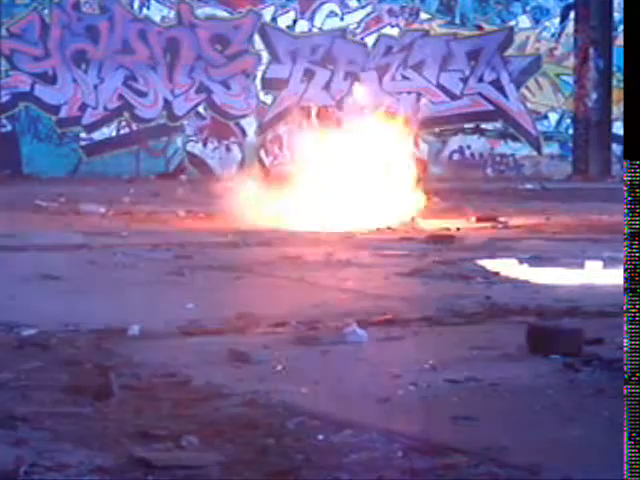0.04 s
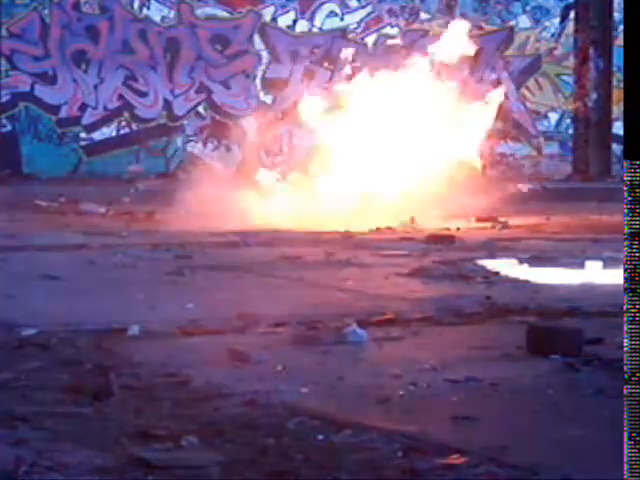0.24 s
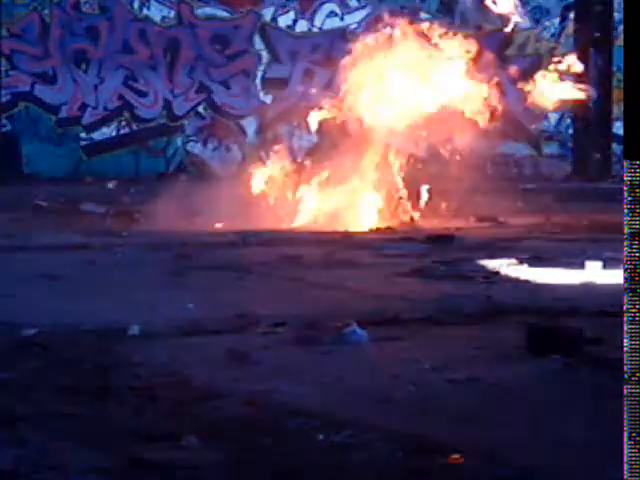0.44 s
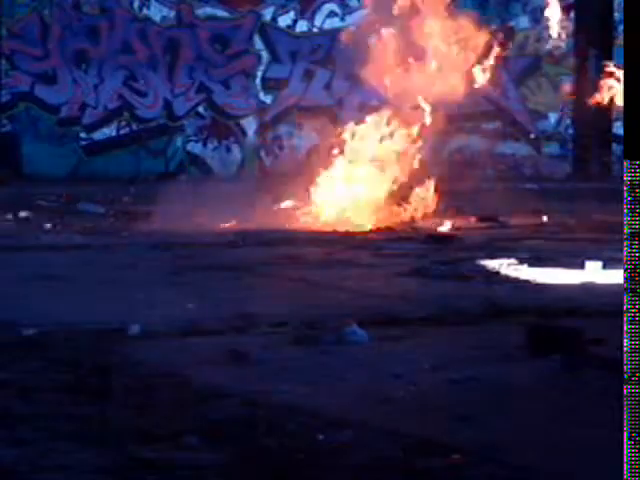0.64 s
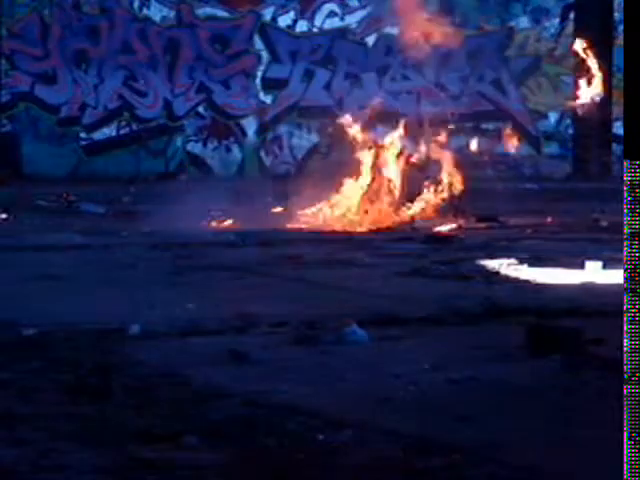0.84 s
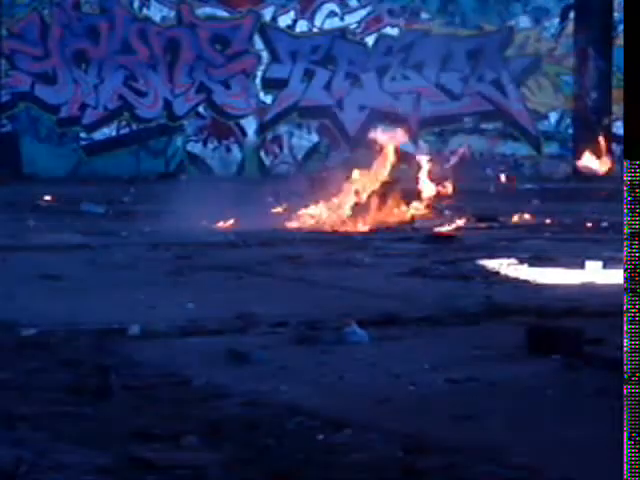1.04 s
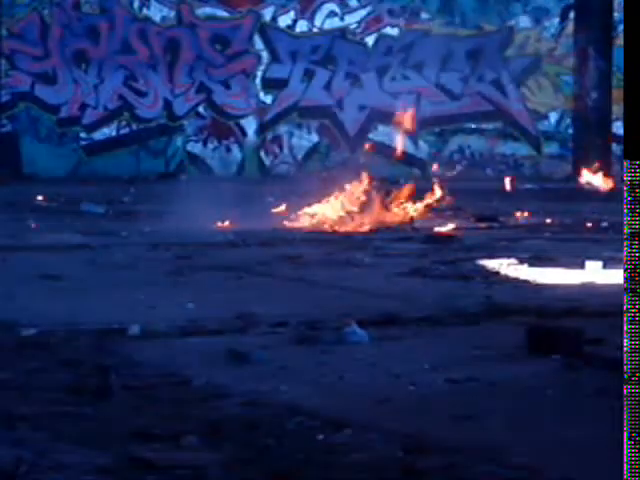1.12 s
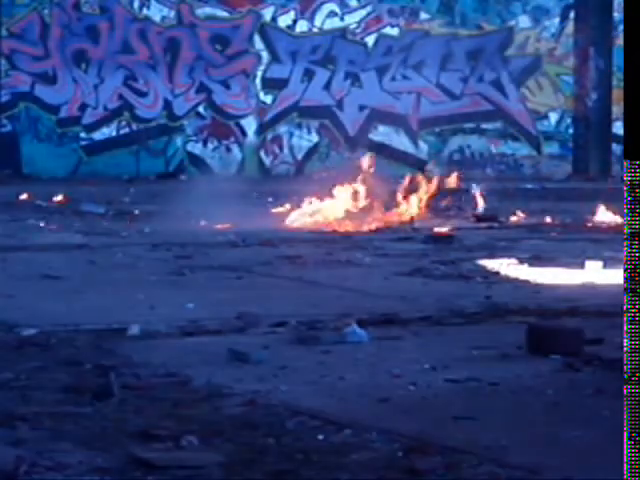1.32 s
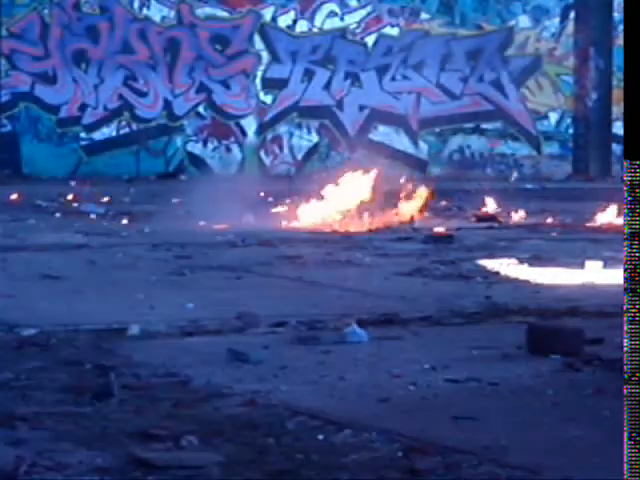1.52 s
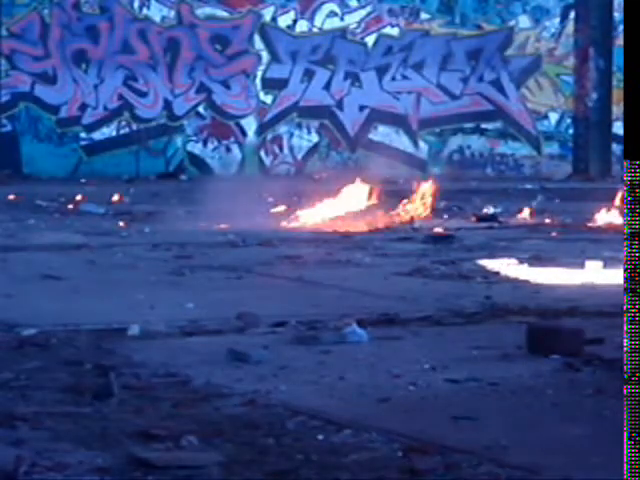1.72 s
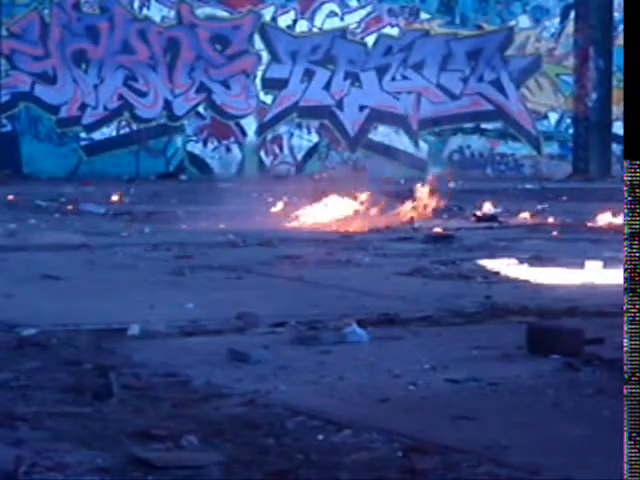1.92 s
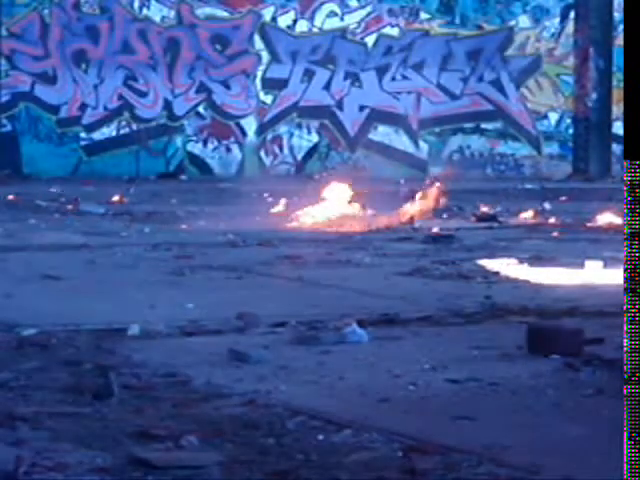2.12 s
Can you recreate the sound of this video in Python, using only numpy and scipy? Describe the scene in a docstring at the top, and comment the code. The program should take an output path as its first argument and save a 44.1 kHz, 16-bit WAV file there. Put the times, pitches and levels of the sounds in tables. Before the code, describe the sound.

A gas can explodes with one sharp, overloaded bang at about 0.1 seconds, just after a brief rising hiss. Quick slaps return from concrete walls, and a midrange roar fades slowly over the next two seconds above a soft rush of fire. Scraps land with faint, dull knocks around 1 second and again near 2.1, with a tiny crackle at 1.7. Everything sounds gritty and lo-fi.

```python
"""Gas can bursting in a concrete building

A gas can lying in a small fire vents with a rising hiss, then bursts. The pressure wave overloads the
microphone; wall reflections and the roar of the fireball sink into long reverberation, and scraps of
the can knock down. The coarse, slow converter of a cheap camera makes it all gritty."""
import sys
import numpy as np
from scipy import signal
from scipy.fft import rfft, irfft
from scipy.io import wavfile
from scipy.ndimage import map_coordinates

SR = 44100
rng = np.random.default_rng(int(sys.argv[2]) if len(sys.argv) > 2 else 0)


def log_audio(samples):
    """Write samples as a 16-bit WAV file to the path given in sys.argv[1]."""
    # one column per channel
    frames = np.atleast_2d(samples).T
    # limit to full scale, then quantise
    limited = np.clip(frames, -1, 1)
    pcm = np.round(limited * 32767).astype(np.int16)
    wavfile.write(sys.argv[1], SR, pcm)


N = 94815
t = np.arange(N) / SR
LOG_HZ = np.log(np.maximum(np.arange(N // 2 + 1) * SR / N, 1))  # of each spectrum bin
BURST_S, WALL_S = .1348, .1513  # arrival of the direct wave and of the first reflection
CONVERTER_HZ = 8000


def undb(db):
    """Decibels to amplitude ratio."""
    return 10 ** (np.asarray(db) / 20)


def unit(x):
    """Scale to rms 1."""
    return x / np.sqrt(np.mean(x ** 2))


def colour(x, points):
    """Filter x by (frequency_hz, gain_db) points, below the converter's Nyquist limit; rms 1."""
    hz, db = np.array(points).T
    gain = undb(np.interp(LOG_HZ, np.log(hz), db)) * (LOG_HZ < np.log(CONVERTER_HZ / 2))
    return unit(irfft(rfft(x) * gain, N))


def decay(start_s, t60_s):
    """Silence until start_s, then exponential decay by 60 dB every t60_s."""
    return (t >= start_s) * np.exp(-np.log(1000) * np.maximum(t - start_s, 0) / t60_s)


def wander(rate_hz):
    """Smooth random fluctuation of rms 1."""
    return unit(map_coordinates(rng.standard_normal(1024), [t * rate_hz], order=3, mode="wrap"))


def blast():
    """Saturation: the pressure wave is one pulse, flat-topped because it pins the microphone."""
    height_db, length_s, edge_s = 7, .0047, .0002
    rise = np.clip((t - BURST_S) / edge_s + .5, 0, 1)
    fall = np.clip((t - BURST_S - length_s) / edge_s + .5, 0, 1)
    return undb(height_db) * (rise - fall)


def reflections():
    """Early reflections: walls return the blast as dense slaps and strong echoes that add in power."""
    # spectrum of the reflections: frequency_hz, relative_db
    slap_spectrum = [(40, -24.5), (130, -18.5), (300, -8), (650, 0.5), (1100, -9.5), (2100, -10),
                     (2600, -17), (3800, -19)]
    # echoes from single walls: start_s, level_db, t60_s
    echoes = [(0.156, -18, 0.019), (.166, -22, 0.08), (0.198, -23, 0.046), (0.225, -28.5, 0.057),
              (0.233, -24.5, 0.047), (0.377, -33.5, .25)]
    slaps_per_s = 7000
    arrivals = rng.random(N) < slaps_per_s / SR
    slaps = arrivals * np.sign(rng.standard_normal(N))
    slaps *= undb(rng.standard_normal(N))  # 1 dB of scatter
    diffuse_power = (undb(-25.5) * decay(WALL_S, t60_s=.7)) ** 2
    echo_power = sum((undb(db) * decay(start_s, t60_s)) ** 2 for start_s, db, t60_s in echoes)
    return colour(slaps, slap_spectrum) * np.sqrt(diffuse_power + echo_power)


def fireball():
    """Reverberation: the fluttering roar decays band by band, the middle range lasting longest."""
    # roar in the building: frequency_hz, relative_db, t60_s
    bands = [(40, -26.5, 2.5), (90.7, -29, 4.3), (157, -14, 4.5), (268.2, -5, 5.0), (449.4, 0, 5.5),
             (751, -3, 4.8), (1097, -7, 4.2), (1517, -7.5, 3.7), (2097, -11, 3.6), (2640, -18.5, 3.1),
             (3810, -24.5, 3)]
    hz, db, t60s = np.array(bands).T
    level_db, attack_s, flutter_db = -26.5, .039, .2
    spectrum = rfft(colour(rng.standard_normal(N), list(zip(hz, db))))
    roar = 0
    for share, t60_s in zip(np.eye(len(hz)), t60s):
        band = irfft(spectrum * np.interp(LOG_HZ, np.log(hz), share), N)  # triangular passband
        roar += band * decay(WALL_S, t60_s) * undb(flutter_db * wander(rate_hz=21.94))
    build_up = 1 - np.exp(-np.maximum(t - WALL_S, 0) / attack_s)
    return roar * undb(level_db) * build_up


def gas_jet():
    """Jet noise: gas escapes the hot can ever louder until the burst, then its echo dies away."""
    # spectrum of the jet: frequency_hz, relative_db
    jet_spectrum = [(40, 1), (200, -2.5), (400, -6.5), (780, -2.5), (1050, -8), (1350, -4.5), (1750, -5.5),
                    (2080, -4.5), (2500, -15), (3800, -17.5)]
    peak_db, rise_db_per_s = -35.5, 46
    swell = undb(peak_db + rise_db_per_s * np.minimum(t - BURST_S, 0))
    release = (t < BURST_S) + decay(BURST_S, t60_s=.35)
    return colour(rng.standard_normal(N), jet_spectrum) * swell * release


def scraps():
    """Damped impacts: pieces of the can land far off, each a dull knock of band-limited noise."""
    # landings: start_s, level_db, pitch_hz
    landings = [(0.961, -32.5, 557), (1.049, -31.5, 494), (1.055, -32, 525), (1.108, -34, 570),
                (2.094, -39, 420)]
    half_width_octaves = .66
    knocks = 0
    for start_s, level_db, pitch_hz in landings:
        octaves = (LOG_HZ - np.log(pitch_hz)) / np.log(2)
        passband = 1 / (1 + (octaves / half_width_octaves) ** 4)
        body = unit(irfft(rfft(rng.standard_normal(N)) * passband, N))
        knocks += body * undb(level_db) * decay(start_s, t60_s=.038)
    return knocks


def fire():
    """Combustion noise: spilt fuel burns down slowly with a soft, uneven rush and one crackle."""
    # spectrum of steady burning: frequency_hz, relative_db
    rush_spectrum = [(40, -8.5), (110, -18.5), (250, -5), (500, -1.5), (900, -7.5), (1800, -15.5),
                     (3800, -31)]
    # spectrum of a crackle: frequency_hz, relative_db
    crackle_spectrum = [(200, -20), (1500, -4), (3800, 2)]
    # crackle of the flames: start_s, level_db
    crackles = [(1.748, -43.5)]
    initial_db, fade_db_per_s, flicker_db = -40, 2.5, .8
    rush = colour(rng.standard_normal(N), rush_spectrum) * (t > WALL_S)
    rush *= undb(initial_db - fade_db_per_s * t + flicker_db * wander(rate_hz=14))
    crackle_envelope = sum(undb(db) * decay(start_s, t60_s=.034) for start_s, db in crackles)
    return rush + colour(rng.standard_normal(N), crackle_spectrum) * crackle_envelope


def scene():
    """Superposition: the pressures of all sources add in one channel."""
    return (gas_jet() + blast() + reflections() + fireball() + fire() + scraps())[None]


def record(dry):
    """Quantisation and sample-and-hold: after the microphone's bass cut, the converter adds grit."""
    bass_cut_hz, q, steps_per_polarity, top_hz = 79.2, .72, 128, 15450
    omega = 2 * np.pi * bass_cut_hz
    highpass = signal.bilinear([1, 0, 0], [1, omega / q, omega ** 2], SR)
    microphone = signal.lfilter(*highpass, dry[0])  # without its bass the pulse swings back
    sampled = signal.resample_poly(microphone, CONVERTER_HZ, SR)
    quantised = np.round(np.clip(sampled, -1, 1) * steps_per_polarity) / steps_per_polarity
    held = quantised[np.arange(N) * CONVERTER_HZ // SR]  # mirrors the spectrum into the treble
    lowpass = signal.ellip(10, .1, 80, top_hz, fs=SR, output="sos")
    return np.clip(signal.sosfilt(lowpass, held), -1, 1)[None]


dry = scene()
out = record(dry)
log_audio(out)
```